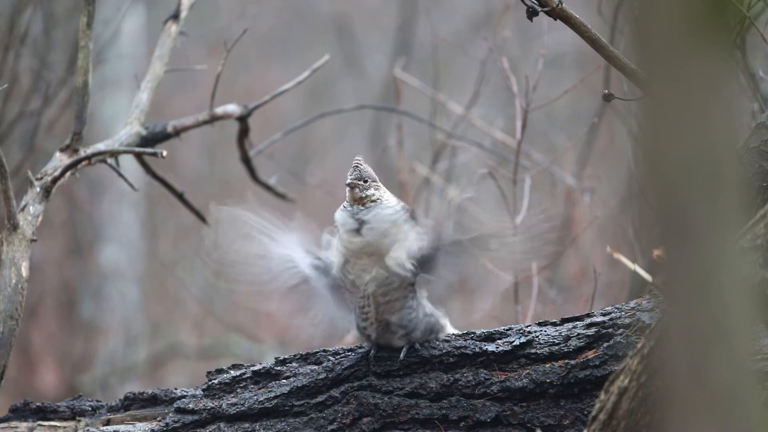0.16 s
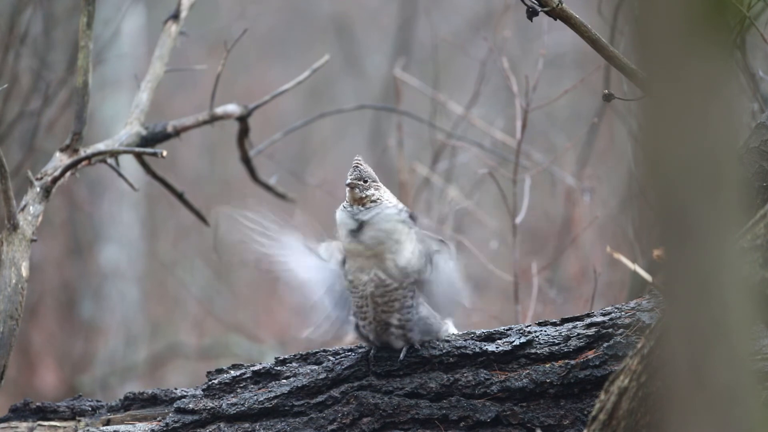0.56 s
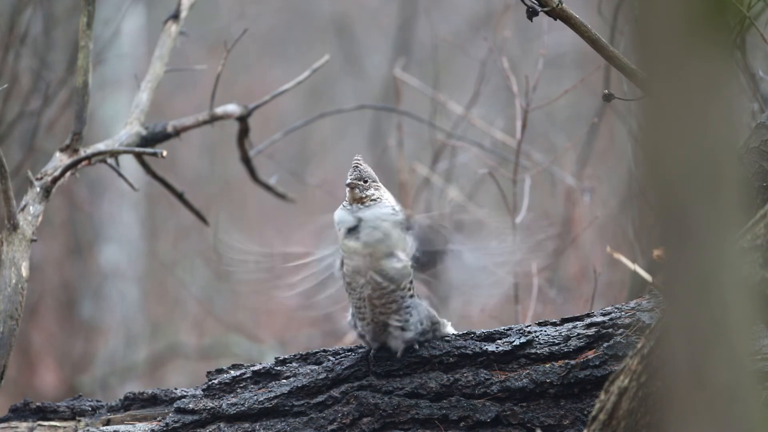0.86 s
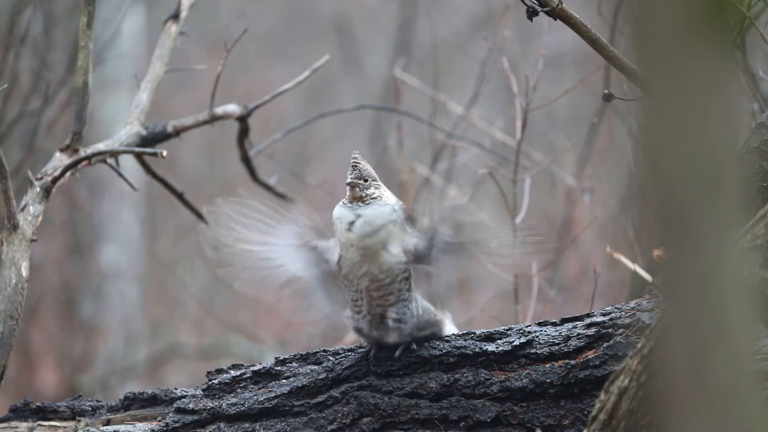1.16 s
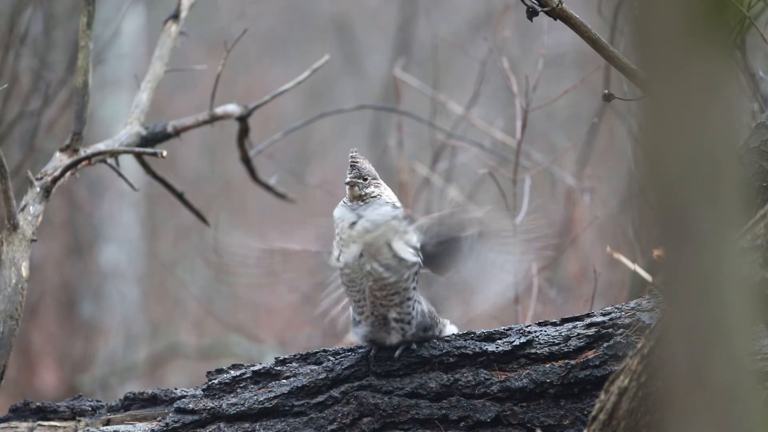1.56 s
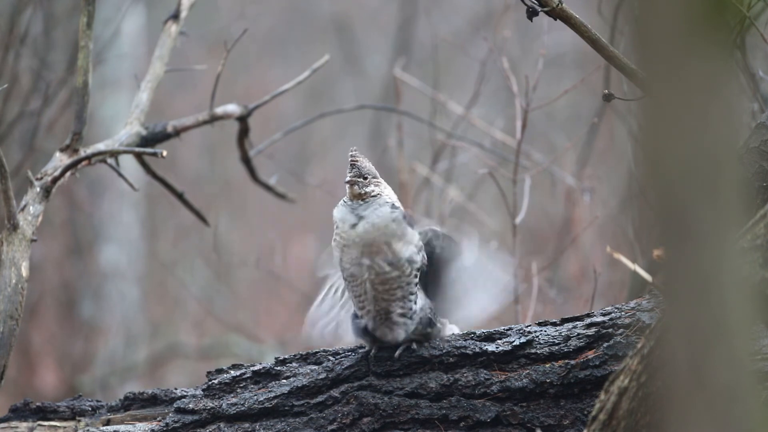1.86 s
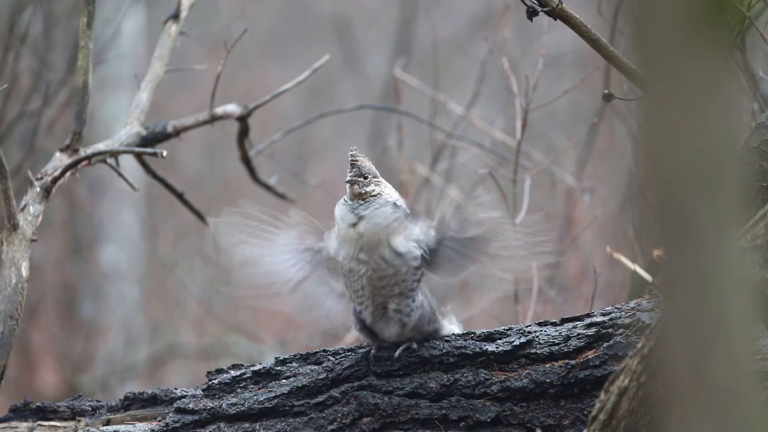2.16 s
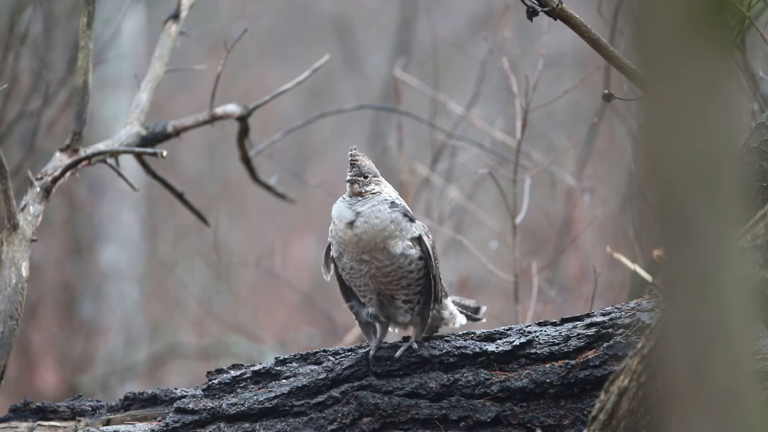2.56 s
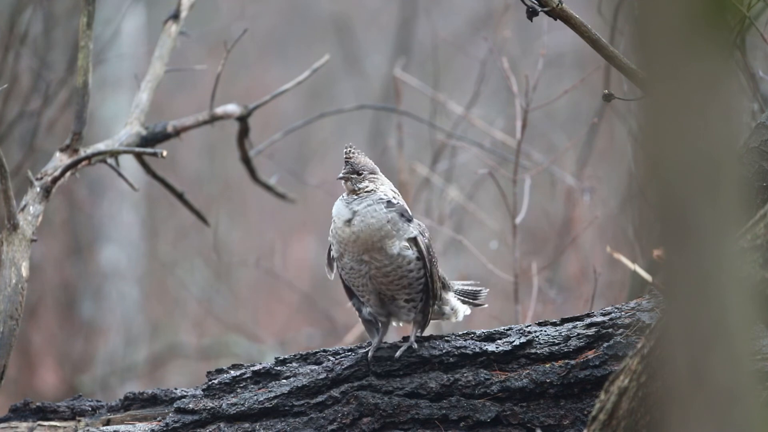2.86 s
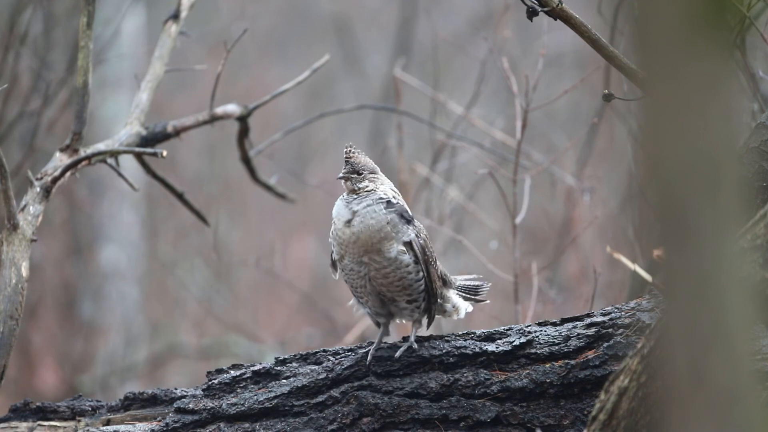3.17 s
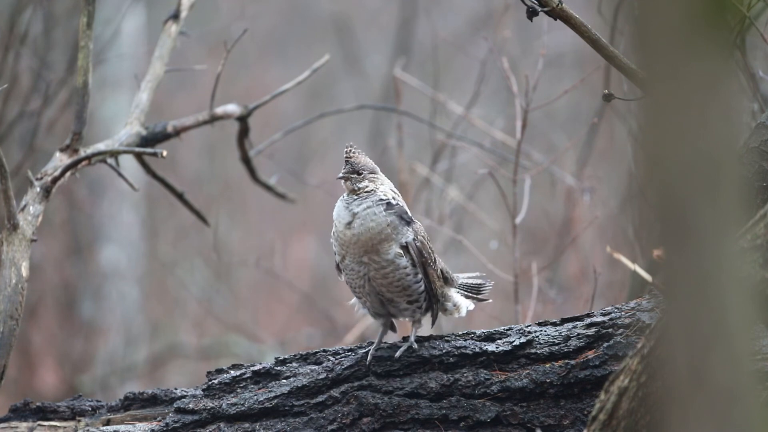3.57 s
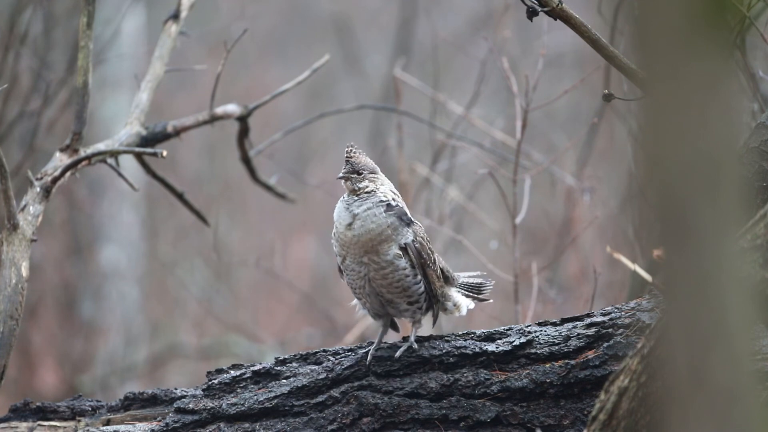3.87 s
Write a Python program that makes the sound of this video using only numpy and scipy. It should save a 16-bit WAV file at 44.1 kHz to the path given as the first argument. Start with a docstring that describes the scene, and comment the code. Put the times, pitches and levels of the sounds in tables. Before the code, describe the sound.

Low, soft wing thumps from a drumming grouse quicken and ease off amid faint forest hush.

```python
"""Quiet woodland: a grouse drums on a log, its wing beats speeding up to a roll and slowing again.
Each beat is one low swing of air pressure with a puff of feather noise. The trees return a soft tail,
distant slopes dull echoes. Far birds chatter and whistle faintly over the hush of the wood and
microphone hiss."""
import sys
import numpy as np
from scipy import signal
from scipy.fft import rfft, irfft
from scipy.io import wavfile
from scipy.ndimage import uniform_filter1d

SR = 44100
rng = np.random.default_rng(int(sys.argv[2]) if len(sys.argv) > 2 else 0)


def file_out(sig):
    """Save sig as 16-bit WAV at sys.argv[1]."""
    # one column per channel
    cols = np.atleast_2d(sig).T
    # limit, then scale
    lim = np.clip(cols, -1, 1)
    pcm = np.round(lim * 32767).astype(np.int16)
    wavfile.write(sys.argv[1], SR, pcm)


N = 176400
TIME_S = np.arange(N) / SR
LOW_CUT_HZ = 29

# wing beats: trough_s, thump_db, thump_hz, snap_ratio, windup_ratio, flick_db, whirr_db, swish_db
BEATS = [(0.0202, -22, 65, 0.48, 0.06, -42, -51.0, -55.5),
         (0.1404, -22.4, 65, 0.48, 0.13, -42, -49.5, -57.5),
         (0.2542, -22.5, 66.2, 0.4, 0.17, -44, -53.5, -57.0),
         (0.359, -24, 62.6, 0.52, 0.27, -42, -57, -55.0), (0.458, -23.5, 67, 0.36, 0.04, -46, -52, -60),
         (0.5488, -24.5, 65.4, 0.52, 0.16, -56, -53, -60.0), (0.6336, -24.5, 67, 0.33, 0.05, -61, -59, -62),
         (0.713, -25.9, 63.5, 0.42, 0.19, -57.3, -56.5, -64), (0.7875, -25.5, 69, 0.46, 0, -64, -55, -54.5),
         (0.8553, -26, 67, 0.7, 0, -61, -53, -57), (0.9175, -25, 67, 0.38, 0.1, -45, -50, -58),
         (0.973, -24, 69, 0.2, 0.07, -40.5, -51, -57), (1.022, -27, 64.7, 0.2, 0.4, -43, -55, -58.5),
         (1.0717, -26, 66.4, 0.36, 0.13, -45.5, -52, -60),
         (1.1287, -27.1, 63.7, 0.44, 0.05, -49, -53.5, -57),
         (1.191, -27.5, 65.5, 0.53, 0.14, -53, -52, -57.0),
         (1.2579, -25.5, 64, 0.63, 0.15, -45.9, -50, -56),
         (1.3301, -27.5, 66, 0.7, 0.04, -44.5, -53.7, -55.5),
         (1.4069, -26.0, 63.5, 0.48, 0.08, -47.9, -53.5, -56.0),
         (1.4884, -24.5, 64.4, 0.36, 0.14, -44, -51, -58.5),
         (1.5789, -25.5, 65.6, 0.55, 0.13, -46.8, -53.5, -60.5),
         (1.6736, -24.4, 66.5, 0.48, 0.05, -51, -51.5, -57),
         (1.7772, -25, 66.8, 0.45, 0.12, -48.5, -53, -60.5),
         (1.886, -25.0, 68.5, 0.63, 0.01, -49.5, -53.6, -58.5),
         (2.002, -24.9, 66.4, 0.52, 0.03, -49, -58, -59.5), (2.126, -26.5, 64, 0.61, 0.1, -57, -60, -61.0),
         (2.2626, -28.5, 62, 0.73, 0.12, -50.5, -59, -61)]


def amp(db):
    """dB to gain."""
    return 10 ** (np.asarray(db) / 20)


def unit_rms(x):
    """Scale to rms 1."""
    return x / np.sqrt(np.mean(x ** 2) + 1e-20)


def curve(points, hz):
    """Interpolate (freq_hz, value) points over log frequency."""
    freq_hz, value = np.transpose(points)
    return np.interp(np.log(hz + 1), np.log(freq_hz + 1), value)


def noise(gain):
    """Noise of rms 1 with spectrum gain(hz)."""
    return unit_rms(irfft(rfft(rng.standard_normal(N)) * gain(np.fft.rfftfreq(N, 1 / SR)), N))


def humps(bands, hz):
    """Summed gain of (centre_hz, width_hz, level_db) resonance humps."""
    return sum(amp(db) / (1 + (2 * (hz - centre_hz) / width_hz) ** 2) / np.sqrt(width_hz)
               for centre_hz, width_hz, db in bands)


def bell(peak_s, width_s):
    """Gaussian envelope, 1/e at width_s from its peak."""
    return np.exp(-((TIME_S - peak_s) / width_s) ** 2)


def swing(crest_s, hz, width_s, late_s=0):
    """Cosine under a bell that peaks late_s after the crest."""
    return np.cos(2 * np.pi * hz * (TIME_S - crest_s)) * bell(crest_s + late_s, width_s)


def puff(peak_s, rise_s, fall_s):
    """Gaussian rise, exponential fall."""
    age_s = TIME_S - peak_s
    return np.exp(np.where(age_s < 0, -(age_s / rise_s) ** 2, -age_s / fall_s))


def resonate(x, modes, onset_s=.002):
    """Ring x through damped modes at unit energy gain; soft onset, as feathers meet softly."""
    t = TIME_S[:2048]
    ring = sum(amp(db) * np.sqrt(width_hz) * np.exp(-np.pi * width_hz * t) * np.sin(2 * np.pi * hz * t)
               for hz, width_hz, db in modes)
    ring *= 1 - np.exp(-t / onset_s)
    return signal.oaconvolve(x, ring / np.linalg.norm(ring))[:N]


def hush(level_db=-57, balance_db=1.2):
    """Woodland hush and microphone hiss: faintly patchy stereo noise, lumpy in the bass."""
    # noise spectrum: freq_hz, density_db
    spectrum = [(12, -30), (20, -8), (44, -1.5), (98, -3.5), (129, -7), (252, -10.5), (789, -12.5),
                (959, -14), (1230, -14), (1380, -16), (2760, -17.5), (7740, -25), (15500, -35.5)]
    # left-right likeness: freq_hz, correlation
    likeness = [(40, 0.86), (90, 0.92), (130, 0.3), (290, 0.2), (640, 0.2), (1400, 0), (15000, 0.07)]
    frames, hz = N // 256 + 5, np.fft.rfftfreq(1024, 1 / SR)
    left_re, left_im, other_re, other_im, patches = rng.standard_normal((frames, 513, 5)).T
    patches_db = .89 * unit_rms(uniform_filter1d(uniform_filter1d(patches, 12, 0), 14, 1))
    lumps = unit_rms(uniform_filter1d(rng.standard_normal(frames), 9))
    lump_depth_db = .16 + 1.7 / (1 + (hz[:, None] / 120) ** 2)
    gain = amp(curve(spectrum, hz)[:, None] + patches_db + lumps * lump_depth_db)
    correlation = curve(likeness, hz)[:, None]
    left = left_re + 1j * left_im
    right = correlation * left + np.sqrt(1 - correlation ** 2) * (other_re + 1j * other_im)
    pair = signal.istft(np.array([left, right]) * gain, nperseg=1024, noverlap=768)[1][:, :N]
    pair = signal.sosfilt(signal.butter(3, LOW_CUT_HZ, "high", fs=SR, output="sos"), pair)
    pair /= np.sqrt(np.mean(pair.mean(0) ** 2))
    return amp(level_db) * pair * amp([[balance_db / 2], [-balance_db / 2]])


def bird_chatter():
    """Far birds: a noisy treble chatter that dies away."""
    # envelope: time_s, level_db
    envelope = [(0, -61.5), (.07, -59), (.085, -68), (.1, -62), (.13, -65.5), (.3, -72), (.35, -101)]
    # treble bands: centre_hz, width_hz, level_db
    bands = [(3600, 380, 0), (4220, 460, -1), (4800, 610, -7)]
    level_db = np.interp(TIME_S, *np.transpose(envelope))
    return amp(level_db) * noise(lambda hz: humps(bands, hz))


def wing_thumps():
    """Air pressure per beat: wings swing back, stop sharply, leave a trough; feather tips whip through."""
    out = np.zeros(N)
    for trough_s, thump_db, thump_hz, snap_ratio, windup_ratio, flick_db, _, _ in BEATS:
        windup = windup_ratio * swing(trough_s - .0194, thump_hz, width_s=.0122, late_s=.009)
        snap = snap_ratio * swing(trough_s - .0043, hz=92, width_s=.0041)
        trough = -swing(trough_s, thump_hz, width_s=.57 / thump_hz, late_s=.0014)
        flick = swing(trough_s - .004, hz=226, width_s=.007)
        out += amp(thump_db) * (windup + snap + trough) + amp(flick_db) * flick
    return out


def feather_puffs():
    """Per beat: a papery clap, a bright swish and the whirr of air through the flight feathers."""
    # clap ring: centre_hz, width_hz, level_db
    clap_modes = [(920, 90, 0), (1110, 20, -4)]
    # flight-feather resonances: centre_hz, width_hz, level_db
    whirr_modes = [(605, 350, -1.5), (1015, 305, -0.5), (1390, 660, -1.5)]
    # feather swish: freq_hz, density_db
    swish_spectrum = [(1500, -17), (2300, -3), (3500, 3), (4600, -2), (7000, -9), (10000, -15.5),
                      (13000, -21), (16000, -32)]
    claps, swish, whirr = np.zeros((3, N))
    for trough_s, *_, whirr_db, swish_db in BEATS:
        claps[round((trough_s - .008) * SR)] = amp(whirr_db + 19)
        swish += amp(swish_db) * puff(trough_s - .007, rise_s=.003, fall_s=.007)
        whirr += amp(whirr_db) * puff(trough_s - .005, rise_s=.004, fall_s=.008)
    whirr *= rng.standard_normal(N)
    swish *= noise(lambda hz: amp(curve(swish_spectrum, hz)) * (hz > 1000))
    return resonate(claps, clap_modes) + swish + resonate(whirr, whirr_modes)


def flutter_and_rustle(flutter_db_per_hz=.72, rustle_db_per_hz=.42):
    """Stirred air flutters low, feathers rustle between beats; both grow with the beat rate."""
    # stirred air: centre_hz, width_hz, level_db
    flutter_bands = [(84, 53, 1), (229.5, 160, -4)]
    # feather rustle: freq_hz, density_db
    rustle_spectrum = [(250, -5), (400, 2.5), (1000, 3.5), (1600, -2.5), (3000, -8.5), (6000, -10),
                       (12000, -27), (16000, -50)]
    troughs_s = np.array(BEATS)[:, 0]
    flutter, rustle = np.zeros((2, N))
    for trough_s, rate_hz in zip(troughs_s, 1 / np.gradient(troughs_s)):
        flutter += amp(-58 + flutter_db_per_hz * rate_hz) * bell(trough_s, width_s=.022)
        rustle += amp(-69.5 + rustle_db_per_hz * rate_hz) * bell(trough_s + .015, width_s=.038)
    flutter *= noise(lambda hz: humps(flutter_bands, hz) / (1 + (hz / 300) ** 8))
    rustle *= noise(lambda hz: amp(curve(rustle_spectrum, hz)) * (hz > 200))
    return flutter + rustle


def tree_reverb(x, gain_db=-18.5, gap_samples=500):
    """Mono scatter off the trunks; each band decays at its own rate."""
    # tail decay: freq_hz, t60_s
    decay = [(60, 0.4), (250, 1), (1000, 0.33), (4000, 0.22)]
    scatter = rng.standard_normal(SR) * (np.arange(SR) > gap_samples)
    hz, t, spectra = signal.stft(scatter, SR, nperseg=1024)
    spectra *= amp(-60 * t / curve(decay, hz)[:, None])
    tail = signal.istft(spectra, SR, nperseg=1024)[1] / np.sqrt(.08 * SR)
    wet = amp(gain_db) * signal.fftconvolve(x, tail)[:N]
    return signal.sosfilt(signal.butter(2, LOW_CUT_HZ, "high", fs=SR, output="sos"), wet)


def slope_echoes(x, centre_hz=80, width_hz=71):
    """Late, dull copies of the thumps from distant slopes."""
    # echo paths: delay_s, gain_db
    echoes = [(.075, -38), (0.292, -25), (.497, -28)]
    hz = np.fft.rfftfreq(N + SR, 1 / SR)
    paths = sum(amp(db) * np.exp(-2j * np.pi * hz * delay_s) for delay_s, db in echoes)
    bass_band = 1 / (1 + (2 * (hz - centre_hz) / width_hz) ** 2)
    return irfft(rfft(x, N + SR) * paths * bass_band, N + SR)[:N]


def tick(peak_s=.104, level_db=-62, centre_hz=7800, width_hz=4000):
    """One brief, bright rustle between the first two beats."""
    hiss = noise(lambda hz: humps([(centre_hz, width_hz, 0)], hz))
    return amp(level_db) * bell(peak_s, width_s=.0066) * hiss


def bird_whistles(ramp_s=.009, waver_depth=.2, waver_hz=60):
    """Far birds: thin gliding tones that waver in level."""
    # whistles: start_s, length_s, from_hz, to_hz, level_db
    whistles = [(2.544, 0.099, 4190, 4240, -64.5), (2.63, 0.05, 4245, 4230, -73),
                (0.138, 0.021, 2980, 3080, -61), (0.53, 0.041, 2230, 2030, -65.5),
                (.592, 0.063, 2330, 2300, -68), (.705, 0.048, 2420, 2410, -69),
                (0.7, 0.035, 2690, 2670, -66), (.785, 0.052, 2750, 3000, -67),
                (1.153, 0.026, 3600, 3700, -67), (1.62, 0.052, 2610, 2660, -72)]
    out = np.zeros(N)
    for start_s, length_s, from_hz, to_hz, level_db in whistles:
        t = np.arange(0, length_s, 1 / SR)
        envelope = np.clip(np.minimum(t, length_s - t) / ramp_s, 0, 1)
        cycles = from_hz * t + (to_hz - from_hz) * t ** 2 / (2 * length_s)
        tone = np.sqrt(2) * np.sin(2 * np.pi * cycles)
        out[round(start_s * SR):][:len(t)] += amp(level_db) * envelope * tone
    return out * (1 + waver_depth * noise(lambda hz: 1 / (1 + (hz / waver_hz) ** 4)))


def scene(balance_db=1.7, birds_send_db=10):
    """Grouse and echoes slightly left; far birds, tick and tree tail centred; hush all round."""
    grouse = wing_thumps() + flutter_and_rustle() + feather_puffs()
    birds = bird_chatter() + bird_whistles()
    tail = tree_reverb(grouse + amp(birds_send_db) * birds)
    drumming = (grouse + slope_echoes(grouse)) * amp([[balance_db / 2], [-balance_db / 2]])
    return drumming + birds + tick() + tail + hush()


def record(dry, left_corner_hz=29, right_corner_hz=21, cutoff_hz=15620):
    """Unequal capsule roll-offs tilt the deep bass to the right; then a steep low-pass."""
    j_hz = 1j * np.fft.rfftfreq(N + SR, 1 / SR)
    tilt = np.sqrt((j_hz + right_corner_hz) / (j_hz + left_corner_hz))
    pair = irfft(rfft(dry, N + SR) * np.array([tilt, 1 / tilt]), N + SR)[:, :N]
    low_pass = signal.firwin(1023, cutoff_hz, window=("kaiser", 11), fs=SR)
    return signal.oaconvolve(pair, low_pass[None], "same")


dry = scene()
out = record(dry)
file_out(out)
```